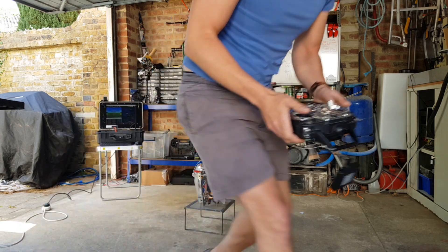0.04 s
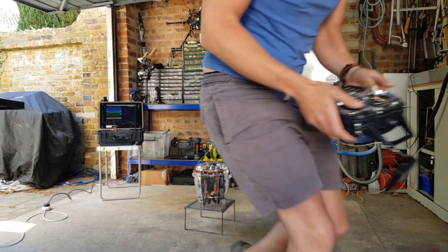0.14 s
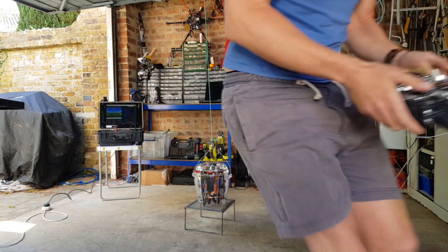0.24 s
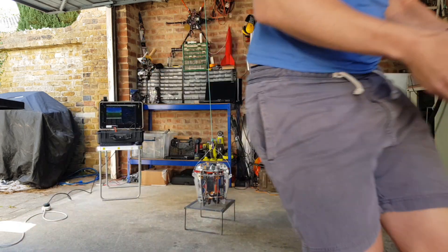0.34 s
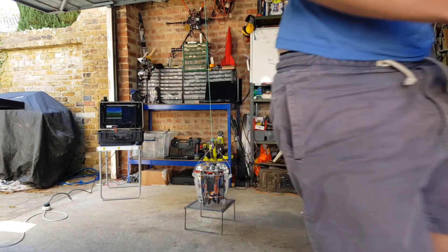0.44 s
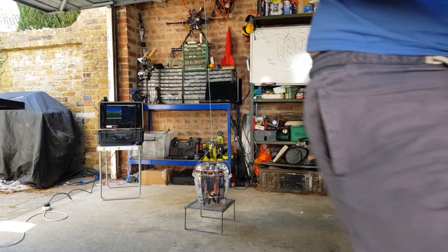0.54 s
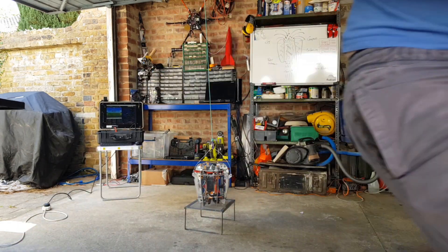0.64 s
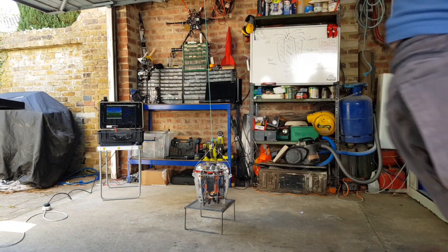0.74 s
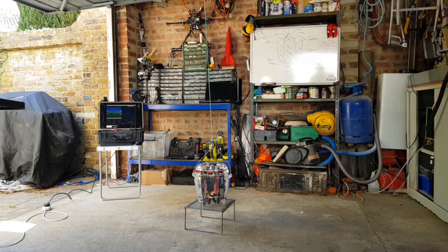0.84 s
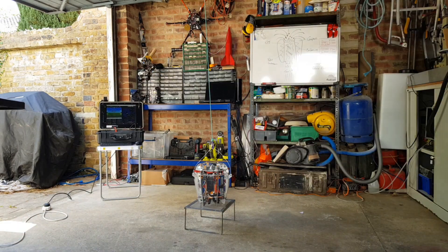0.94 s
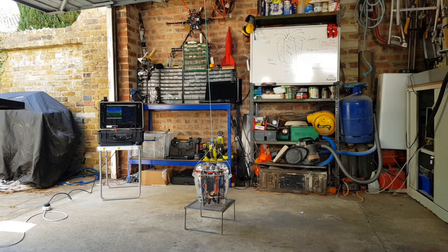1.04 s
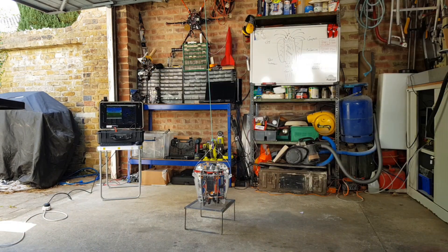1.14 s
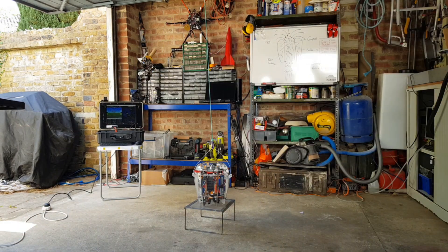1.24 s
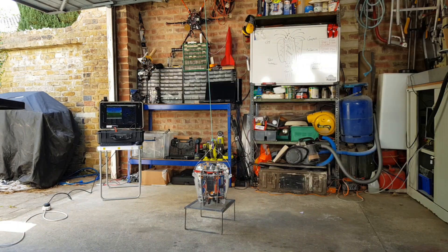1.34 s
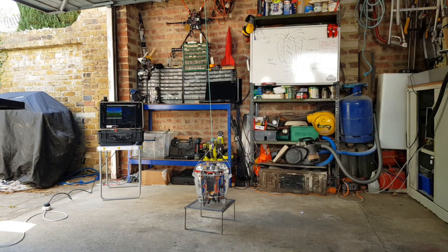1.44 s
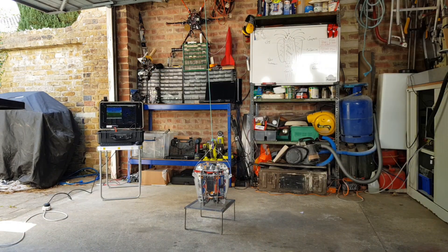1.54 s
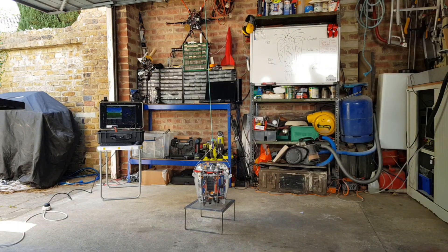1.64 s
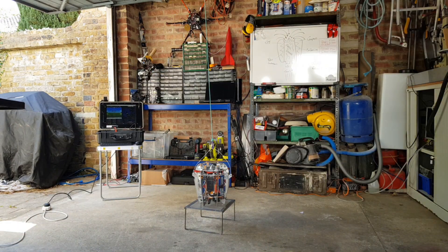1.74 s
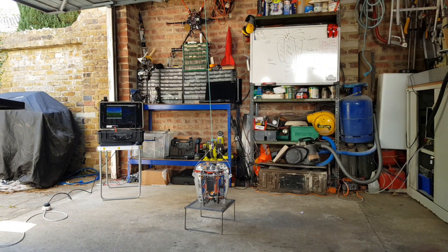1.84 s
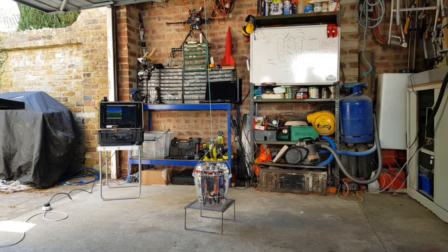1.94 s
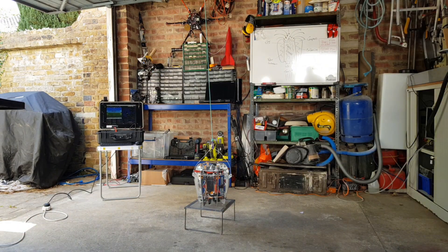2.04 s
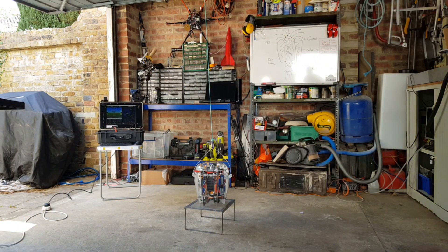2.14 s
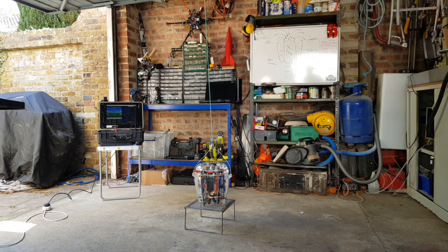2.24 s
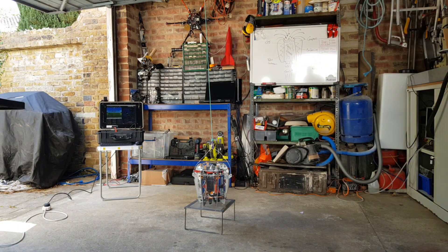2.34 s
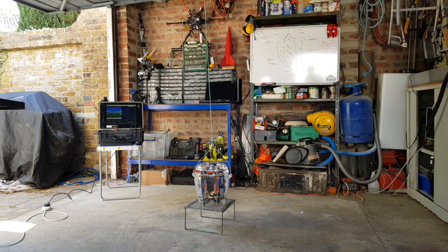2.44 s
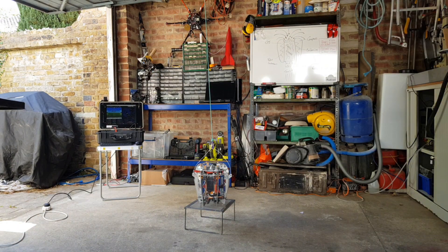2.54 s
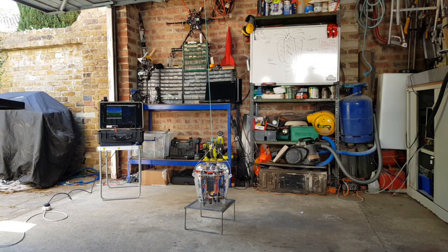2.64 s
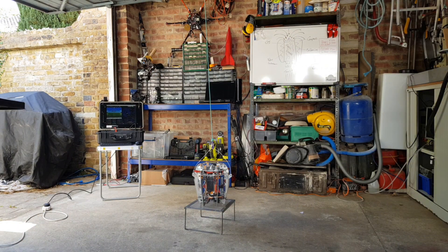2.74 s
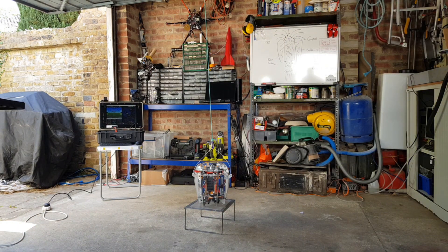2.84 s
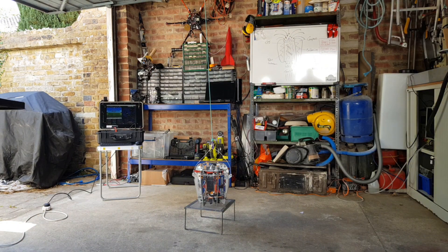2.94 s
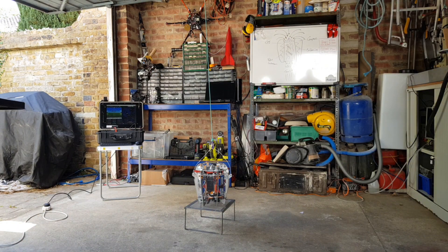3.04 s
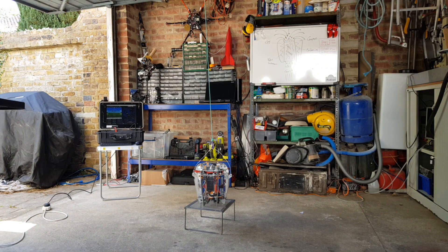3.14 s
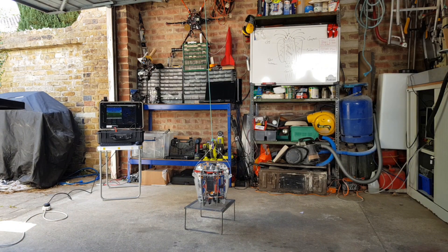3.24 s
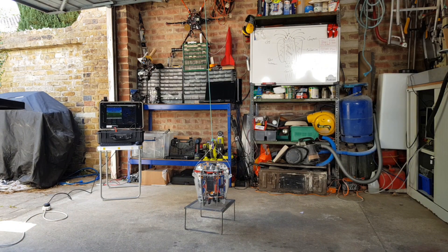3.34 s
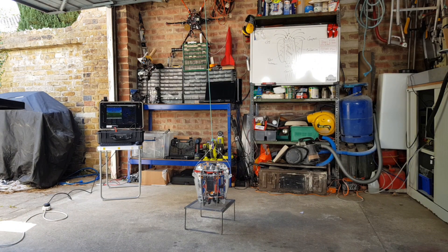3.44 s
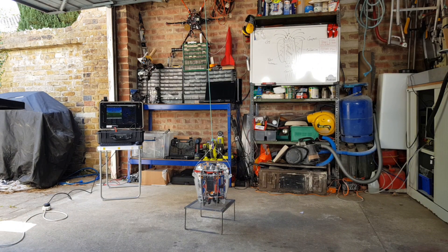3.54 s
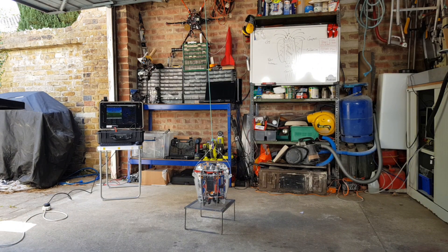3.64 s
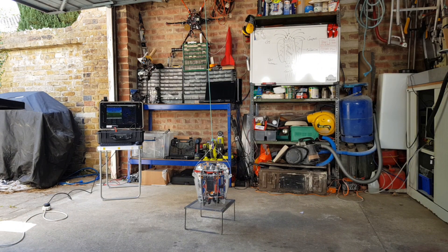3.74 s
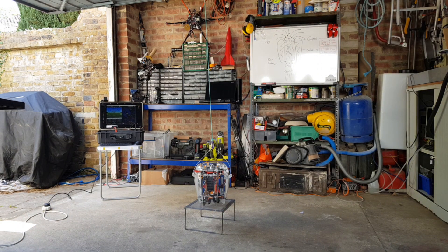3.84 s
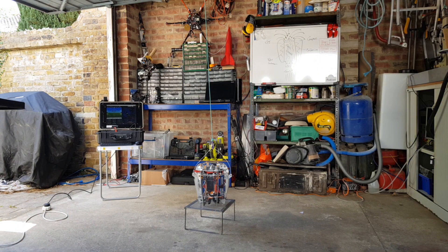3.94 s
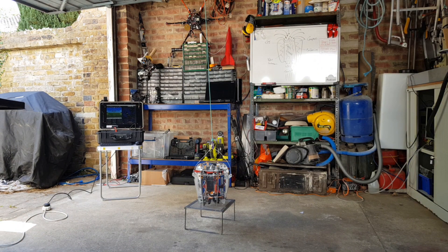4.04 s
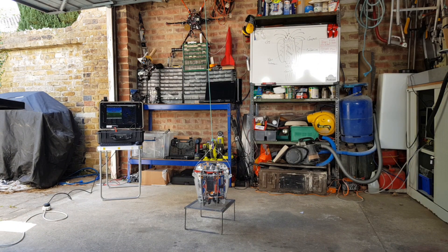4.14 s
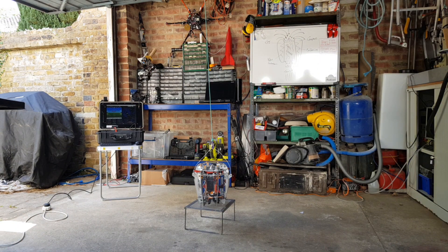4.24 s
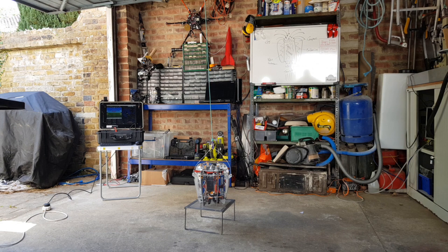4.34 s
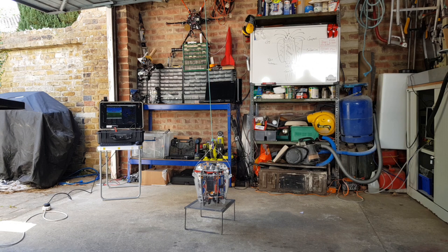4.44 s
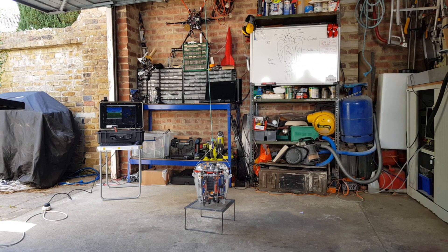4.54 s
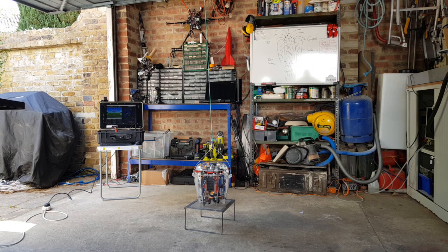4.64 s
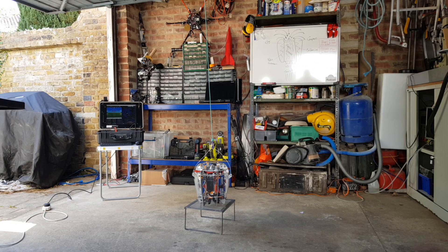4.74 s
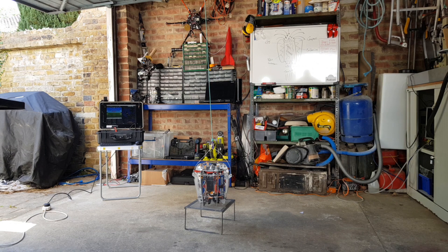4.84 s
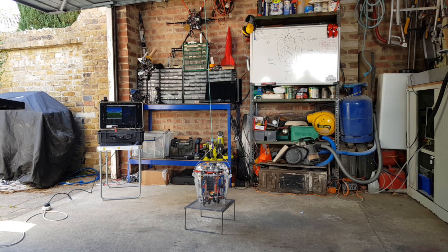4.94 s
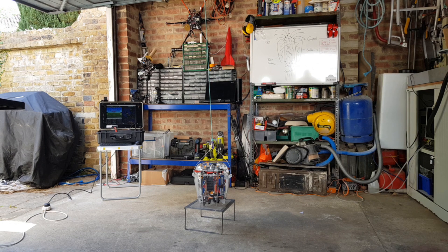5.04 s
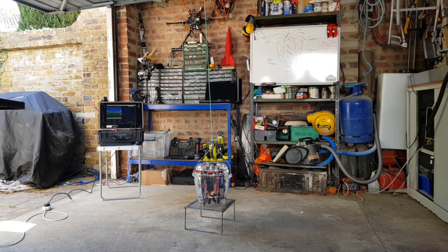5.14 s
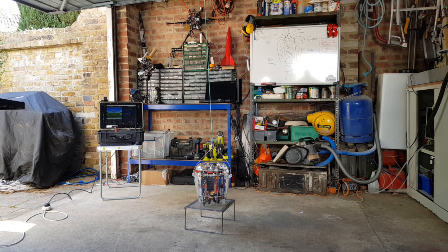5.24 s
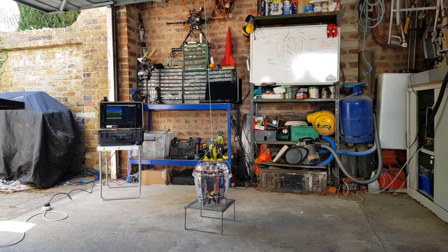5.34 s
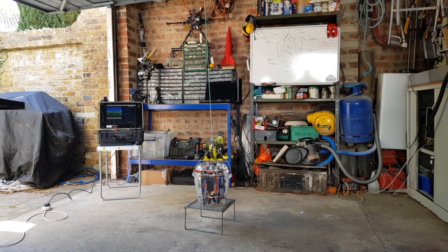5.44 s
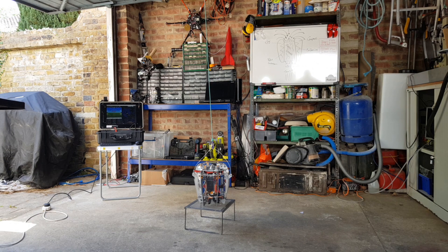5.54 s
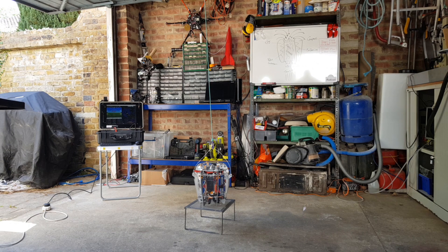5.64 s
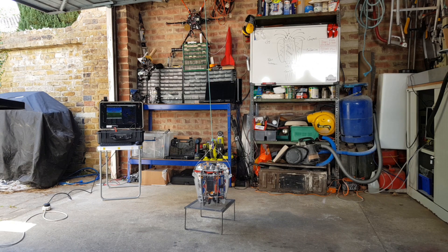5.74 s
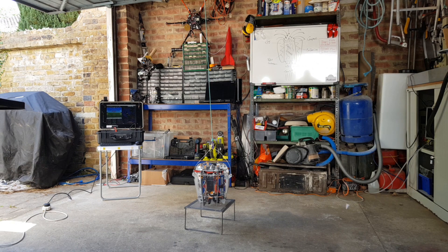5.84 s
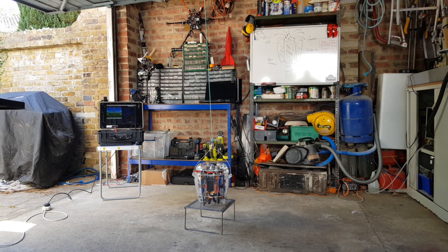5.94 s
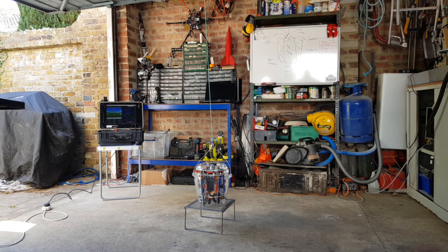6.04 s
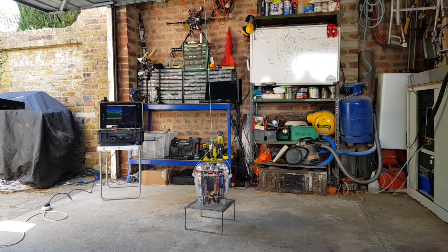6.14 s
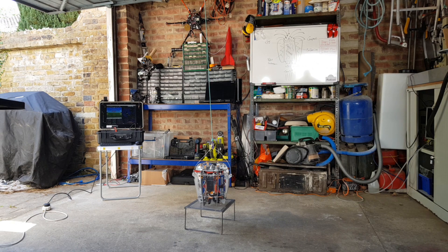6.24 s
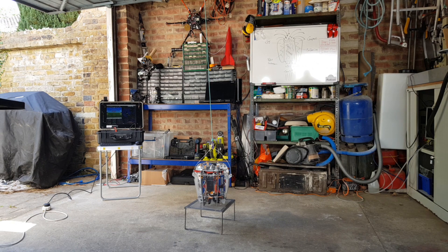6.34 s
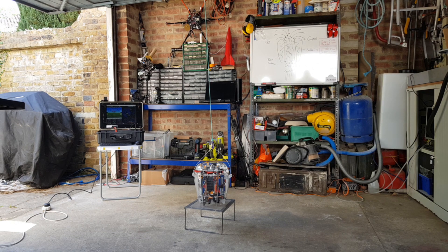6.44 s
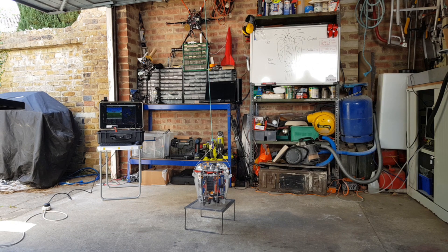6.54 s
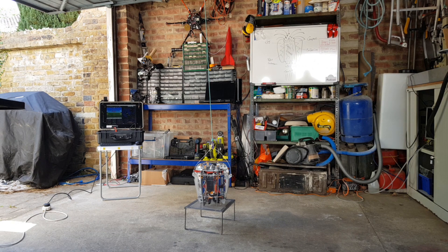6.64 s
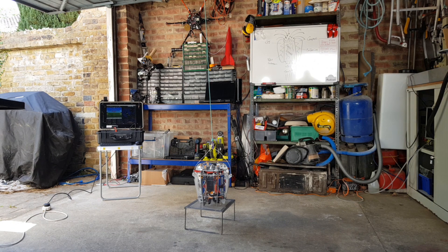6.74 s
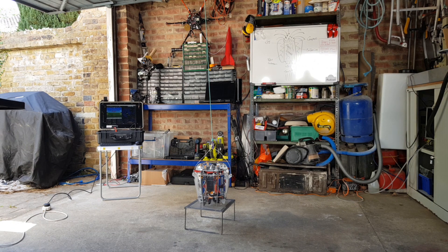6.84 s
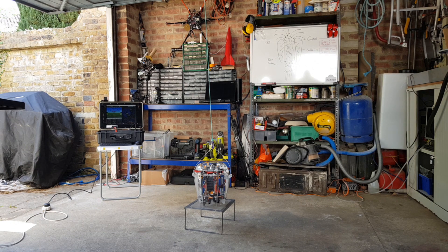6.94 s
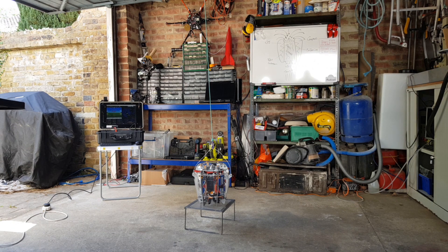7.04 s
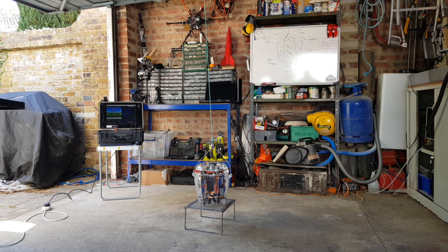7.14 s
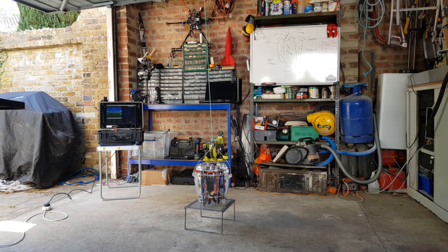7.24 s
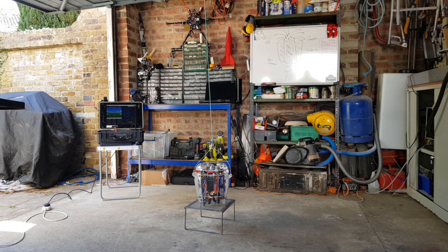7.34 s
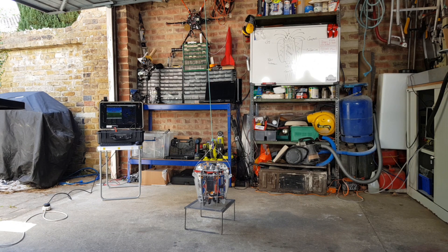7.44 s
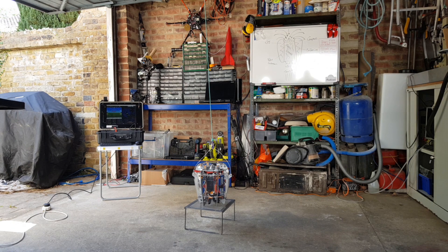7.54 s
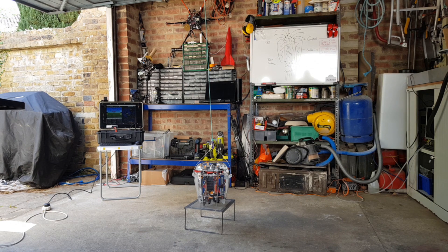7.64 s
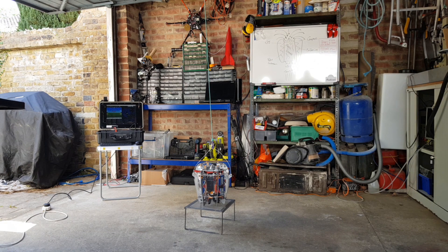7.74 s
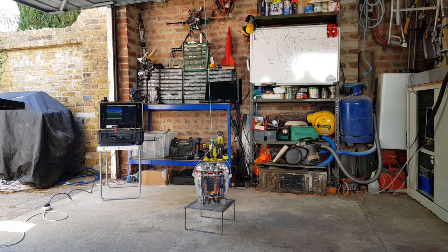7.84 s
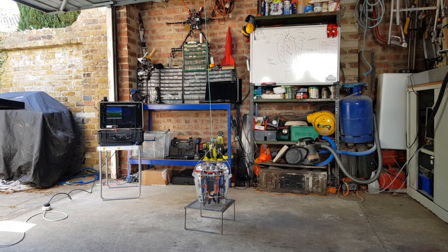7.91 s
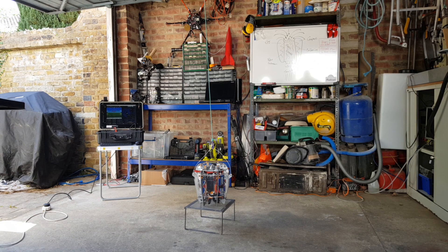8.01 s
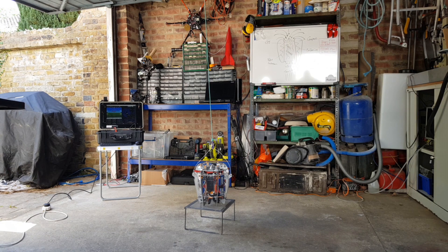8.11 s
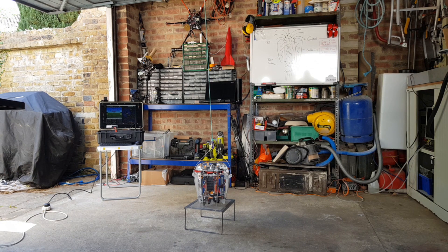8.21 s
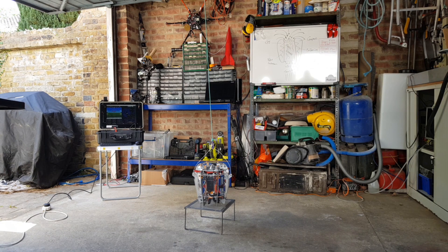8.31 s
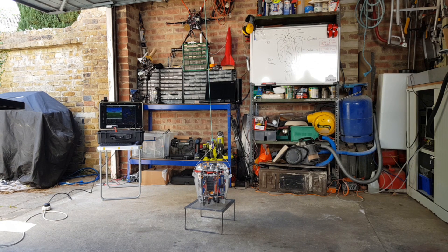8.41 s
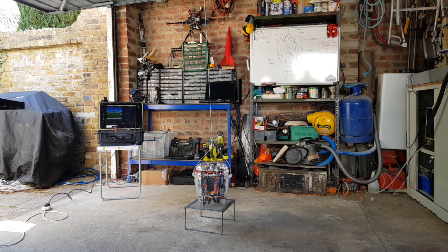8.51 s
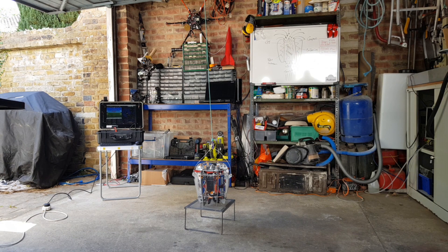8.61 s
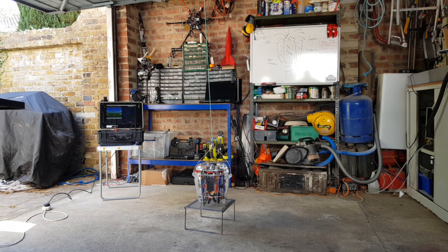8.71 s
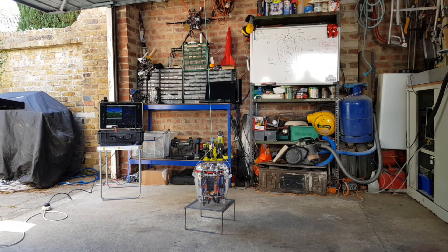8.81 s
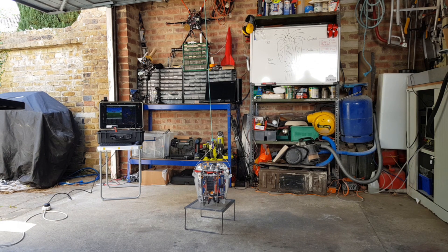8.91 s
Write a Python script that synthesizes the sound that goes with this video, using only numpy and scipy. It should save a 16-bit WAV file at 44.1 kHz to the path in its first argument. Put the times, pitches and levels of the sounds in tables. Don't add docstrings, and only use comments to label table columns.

```python
import sys
import numpy as np
from scipy import signal
from scipy.io import wavfile
from scipy.ndimage import uniform_filter1d

SR = 44100
rng = np.random.default_rng(int(sys.argv[2]) if len(sys.argv) > 2 else 0)


def boost_factor(decibels):
    exponent = np.asarray(decibels, float) / 20
    return 10 ** exponent


def output_pcm(signal):
    pcm = np.clip(np.atleast_2d(signal).T, -1, 1) * 32767
    wavfile.write(sys.argv[1], SR, np.round(pcm).astype(np.int16))


N = 395577
TIME = np.arange(N) / SR
SPINNING = (round(4.7 * SR), N)
IDLE_HZ = 149

# frequency in Hz, likeness [0-1].
LIKENESS = [(60, 0.94), (130, 0.9), (290, 1), (640, 0.66), (1410, 0.32), (3100, 0.34), (6820, 0.24),
            (15000, 0.62)]


def evened(x):
    return x / np.sqrt(np.mean(x ** 2) + 1e-20)


def read(points, hz):
    f, value = np.transpose(points)
    return np.interp(np.log(hz + 1), np.log(f + 1), value)


def curve(rows):
    s, value = np.transpose(rows)
    return np.interp(TIME, s, value)


def lift_db(modes, hz):
    return sum(db / (1 + (2 * (hz - f) / width) ** 2) for f, width, db in modes)


def drift(top_hz, low_hz=.3, start=0):
    coarse = np.arange(0, N / SR + 1, .004)
    hz = np.geomspace(low_hz, top_hz, num=16)[:, None]
    waves = np.sin(2 * np.pi * (hz * coarse + rng.random(hz.shape))) / np.sqrt(hz)
    return np.interp(TIME[start:], coarse, evened(waves.sum(0)))


def noise(spectrum, modes=(), patchy_db=0.5, alike=1., size=512, span=(0, N)):
    # frequency in Hz, left over right in dB.
    lean = [(60, 5), (110, -1), (200, 4.5), (380, 0.5), (700, 4), (1290, 0.5), (2380, 3), (4400, -2.5),
            (8120, 0.5), (15000, 5)]
    length = span[1] - span[0]
    hz = np.fft.rfftfreq(size, 1 / SR)
    a, b, c, d, patches = rng.standard_normal((4 * length // size + 5, len(hz), 5)).T
    patches = uniform_filter1d(patches, size=size // 80, axis=0)
    patches = evened(uniform_filter1d(patches, size=8192 // size, axis=1))
    same = np.clip(alike * read(LIKENESS, hz), -1, 1)[:, None]
    left = a + 1j * b
    z = np.array([left, same * left + np.sqrt(1 - same ** 2) * (c + 1j * d)])
    z *= boost_factor(np.outer([.5, -.5], read(lean, hz)))[:, :, None]
    z *= boost_factor((read(spectrum, hz) + lift_db(modes, hz))[:, None] + patchy_db * patches)
    sound = signal.istft(z, nperseg=size, noverlap=3 * size // 4)[1][:, :length]
    return np.pad(evened(sound), ((0, 0), (span[0], N - span[1])))


def resonate(x, hz, width):
    turn = np.exp(2j * np.pi * np.cumsum(hz * np.ones(x.shape[-1])) / SR)
    r = np.exp(-np.pi * width / SR)
    return 2 * (turn * signal.lfilter([1 - r], [1, -r], x / turn)).real


def add(mix, s, sound, pan_db):
    part = mix[:, round(s * SR):][:, :sound.shape[-1]]
    part += sound[..., :part.shape[1]] * boost_factor([[pan_db / 2], [-pan_db / 2]])


def tone(hz, wobble_db, wander=0.57):
    phase, start = 2 * np.pi * np.cumsum(hz) / SR, N - len(hz)
    ports = []
    for _ in "LR":
        level = np.sqrt(2) * boost_factor(wobble_db * drift(24, 1.8, start))
        ports.append(level * np.sin(phase + wander * drift(14, .3, start)))
    return np.array(ports)


def background():
    # frequency in Hz, density in dB per Hz.
    air = [(20, 5), (50, 26.5), (150, 8.5), (300, 12.5), (1000, 2), (1500, 2), (3000, -39), (4500, -8),
           (5000, -2), (5500, -5), (8600, -8), (9400, -4), (11000, 5), (15700, 1.5), (17000, -17)]
    port = [(760, -65), (1300, -51), (1600, -27), (1810, -14), (2020, -9), (2290, -1.5), (2440, -6.5),
            (2820, -13), (3070, -22), (4200, -30), (5460, -69), (9240, -120)]
    out = boost_factor(-69.5) * noise(air, alike=0.69, size=2048)
    out += boost_factor(-90) * tone(np.full(N, 4910.), 4.5)
    out += boost_factor(-60) * noise(port, patchy_db=1.6)[0] * boost_factor([[0], [-27]])
    return out


def drags():
    # time in seconds, effort in dB.
    rustle = [(.08, -32), (.28, -16), (.5, -19), (.67, -17), (.9, -18), (1.05, -12), (1.2, -12),
              (1.38, -15)]
    shuffle = [(1.42, -14), (1.49, 2), (1.56, -4), (1.62, 2.5), (1.69, -5), (1.82, 3.5), (1.99, -3),
               (2.08, 1), (2.26, 0), (2.31, -6), (2.39, 1), (2.9, -1), (3.07, -2.5), (3.11, 0), (3.36, -4),
               (3.41, 2), (3.53, -3), (3.7, -38)]
    # time in seconds, level in dB, t60 in seconds.
    thuds = [
        (0.2, -44.5, .33),
        (0.575, -42, 0.5),
        (1.06, -47, 1.3),
        (1.69, -67, .9),
        (2.08, -71, 2.),
        (2.74, -55, 0.51),
    ]
    # frequency in Hz, density in dB per Hz.
    scrape = [(880, -25), (1500, -8), (2110, -7.5), (3070, -4), (4080, -2.5), (4550, -6), (6090, -4.5),
              (8420, -11), (9550, -22), (11000, -15.5), (14300, -38), (22000, -120)]
    fizz = [(6000, -14), (9000, -4), (12000, 0), (16000, -10), (17000, -32)]
    body = [(200, -25), (330, -6.5), (590, 4.5), (900, -9), (1330, 2), (1700, -5), (2300, -15.5)]
    rumble = [(20, -16), (35, -9), (55, -3), (90, -11.5), (180, -4.5), (260, -19.5), (400, -32)]
    # frequency in Hz, width in Hz, lift in dB.
    sole = [(1295, 170, 6.5), (3900, 300, -3), (6070, 300, 1.5), (8460, 920, 4.5)]
    walking = (0, round(3.8 * SR))
    load_db_per_s = 298

    grains = boost_factor(1.5 * np.minimum(rng.exponential(1, N), 3)) * (rng.random(N) < 500 / SR)
    grit = evened(1 + 0.18 * signal.lfilter([1], [1, -.985], grains))
    grit *= np.interp(TIME, [3.62, 3.75], [1, 0])
    weight = 0
    for s, db, t60 in thuds:
        weight = weight + boost_factor(db + np.minimum(load_db_per_s * (TIME - s), 60 * (s - TIME) / t60))
    out = weight * noise(rumble, size=1024, span=walking)

    effort_db = curve(rustle + shuffle)
    leaving_db = -2.5 * np.maximum(TIME - shuffle[1][0], 0)
    light_db = .8 * np.minimum(effort_db + 5, 0)
    layers = [(scrape, -52, .55), (fizz, -59.5 + leaving_db, 1.1), (body, -56.5 + leaving_db + light_db, .9)]
    for spectrum, db, alike in layers:
        rub = noise(spectrum, sole, patchy_db=2.5, alike=alike, size=256, span=walking)
        out += boost_factor(effort_db + db) * grit * rub
    return out


def steps():
    # time in seconds, peak in dB, ring in Hz, slap in dB.
    blows = [(0.099, -28.5, 480, -42), (0.191, -31, 360, -23), (0.246, -33.5, 180, -14),
             (0.515, -33.5, 593, -33), (0.63, -33.5, 330, -26), (1.014, -31, 177, -35),
             (1.044, -30.5, 178, -38), (1.089, -30.5, 179, -9), (1.482, -31, 520, -3),
             (1.608, -36.5, 1750, -5.5), (1.689, -28, 172, -25), (1.795, -30, 560, -6),
             (2.0, -44, 1350, -8), (2.091, -27, 855, -9), (2.18, -30, 440, -21), (2.228, -37, 1830, -8),
             (2.259, -23, 1300, -1), (2.416, -28.5, 640, -5), (2.543, -30.5, 640, -10),
             (2.725, -29.5, 320, -20), (2.748, -34, 800, -4), (2.858, -46.5, 401, 6),
             (2.977, -44, 1150, -15), (3.064, -34, 530, -14), (3.2, -45.5, 2400, -20),
             (3.075, -40, 1100, -12), (2.251, -36, 1500, -12), (1.583, -46, 1370, -20),
             (2.345, -41, 1300, -15), (2.548, -36, 900, -12), (3.408, -40, 1700, -12),
             (3.432, -42, 1600, -12), (3.445, -43, 1900, -12), (1.803, -33, 600, -10),
             (1.49, -34, 600, -10), (2.195, -36, 450, -25), (.177, -36, 170, -30), (2.565, -39, 180, -25),
             (2.266, -31, 1740, -6), (1.901, -40, 1900, -8), (0.848, -55.5, 1100, -8)]
    sole_top_hz = 2200
    out, t = np.zeros((2, N)), TIME[:SR // 5]
    for s, db, hz, slap_db in blows:
        softness_db = min(slap_db, 0)
        t60 = 0.046 - .0034 * softness_db
        burst = rng.standard_normal(len(t)) * boost_factor(-60 * t / t60) * np.minimum(t / 0.0036, 1)
        burst[60] += boost_factor(15 + 0.35 * softness_db)
        ring = resonate(resonate(burst, hz, 0.5 * hz), hz, 2.4 * hz)
        slap = resonate(resonate(burst * boost_factor(-300 * t), 930, 1160), 980, 1900)
        blow = ring / abs(ring).max() + boost_factor(slap_db + 8) * slap / abs(slap).max()
        muffle = signal.butter(2, max(sole_top_hz, 1.5 * hz), fs=SR, output="sos")
        add(out, s + 0.001794, boost_factor(db - 5.5) * signal.sosfilt(muffle, blow), 2.2)
    return out


def scuffs():
    # start in seconds, hold in seconds, level in dB, brightest Hz, width in Hz.
    slides = [(0.103, 0.048, -48.5, 12000, 7300), (0.201, 0.01, -56, 7700, 6000),
              (0.244, 0.06, -60.5, 11000, 8000), (0.517, 0.048, -35, 10900, 8800),
              (0.529, 0.011, -37.5, 2620, 830), (0.48, 0.055, -64, 10000, 10000),
              (1., 0.07, -57.5, 9000, 13000), (1.046, 0.008, -41.5, 12000, 6600),
              (4.58, .07, -75, 5900, 3030), (.516, 0.07, -51, 770, 700), (1.81, 0.1, -51.5, 2200, 3300),
              (.247, .02, -48.5, 670, 740), (3.395, 0.08, -55, 580, 70), (2.519, .05, -52, 3000, 2700),
              (1.49, .018, -45, 11000, 8000), (1.44, .05, -58, 6000, 1500), (4.15, .06, -80, 6500, 3000),
              (2.335, .03, -57, 6230, 400), (1.755, .02, -56, 4000, 250), (3.08, .1, -64, 1330, 200),
              (3.09, .05, -60, 3400, 500), (1.83, .07, -56, 1900, 300), (.74, .02, -56, 9000, 8000),
              (3.08, .07, -62, 560, 200), (3.4, .06, -51.5, 1500, 900), (3.47, .07, -60, 1340, 200)]
    jerks = [
        (4.751, 0.09, -48.5, 700, 800),
        (4.752, .05, -64, 9500, 300),
        (4.752, 0.055, -60, 9000, 9000),
        (4.875, 0.053, -50.5, 6000, 8000),
        (4.919, 0.03, -42, 584, 50),
        (4.94, .2, -48, 380, 160),
    ]
    out, t = np.zeros((2, N)), TIME[:SR // 3]
    for s, held, db, hz, width in slides + jerks:
        common, left, right, sand = rng.standard_normal((4, len(t)))
        rub = common + np.array([left, right])
        band = evened(resonate(resonate(rub, hz, width), hz, 1.26 * width))
        shape = np.minimum(t / 0.01, 1) * boost_factor(db - 60 * np.maximum(t - held, 0) / 0.16)
        grit = boost_factor(2.7 * evened(uniform_filter1d(sand, size=90)))
        add(out, s, band * shape * grit, 1.2)
    return out


def ticks():
    # time in seconds, peak in dB, ring in Hz, left over right in dB.
    touches = [(0.105, -27, 1300, 7), (0.2468, -30.5, 1000, 2), (0.2054, -32, 11300, 7),
               (0.2866, -38.5, 6880, 0.0), (0.736, -29, 7260, -18), (0.7413, -33, 3900, -16),
               (0.9501, -34.5, 6900, -15), (0.9847, -33, 7780, -16), (0.994, -40, 6560, -15),
               (1.0026, -35, 8780, -9), (1.051, -29.5, 11600, -13), (1.057, -36, 11800, 6),
               (1.0916, -35, 5820, -20), (1.113, -30, 7140, -19), (1.118, -30, 6840, -17),
               (1.1542, -19, 5900, -14), (1.163, -27, 11600, -14), (1.297, -39, 6720, -10),
               (1.322, -40, 6500, -10), (1.4965, -30, 11000, -1), (1.499, -26, 6000, -1.5),
               (1.3648, -42, 11100, -8), (1.0501, -33, 7000, -3), (1.623, -40, 11000, 0),
               (1.7136, -41, 5930, -2), (1.7992, -37, 6070, 3), (1.9035, -38, 3330, 0),
               (2.2317, -36, 3340, 0), (2.551, -37, 3280, 1), (3.4225, -38, 3760, -1),
               (3.445, -40, 3500, 0), (.5282, -26, 7660, -2), (.1132, -36, 10900, 4),
               (.2795, -42, 10000, 0), (1.8121, -22.5, 11500, 10), (2.093, -29, 3450, 12),
               (2.4176, -27, 4120, 3), (3.393, -25, 3880, 2)]
    out, t = np.zeros((2, N)), TIME[:SR // 20]
    for s, db, hz, pan_db in touches:
        burst = rng.standard_normal(len(t)) * boost_factor(-60 * t / .014)
        burst[8] = 4
        ring = resonate(resonate(burst, hz, 2200), hz, 3100)
        crack = resonate(resonate(burst, 9200, 7600), 9900, 8200)
        too_small_for_bass = signal.butter(2, .6 * min(hz, 6500), "high", fs=SR, output="sos")
        tick = signal.sosfilt(too_small_for_bass, ring + 0.56 * crack)
        add(out, s, boost_factor(db - 3) * tick / abs(tick).max(), pan_db)
    return out


def garage(x):
    # frequency in Hz, t60 in seconds.
    decay = [(100, 0.16), (500, 0.38), (2000, 0.35), (8000, 0.13), (16000, 0.062)]
    taps = np.zeros((2, SR // 2))
    at = np.arange(300, SR // 2 - 20, 20)
    at = at + rng.integers(0, 20, (2, len(at)))
    np.put_along_axis(taps, at, rng.choice([-1., 1.], at.shape), 1)
    hz, t, z = signal.stft(taps, SR, nperseg=256)
    same = np.clip(read(LIKENESS, hz), 0, 1)[:, None]
    z[1] = same * z[0] + np.sqrt(1 - same ** 2) * z[1]
    tail = signal.istft(z * boost_factor(-60 * t / read(decay, hz)[:, None]), SR, nperseg=256)[1]
    return signal.fftconvolve(x.mean(0)[None], tail / np.linalg.norm(tail[0]), axes=1)[:, :N]


def rotor():
    # time in seconds, turns per second.
    spool = [(4.74, 24), (4.864, 43), (4.9, 46.8), (4.96, 49.5), (5.016, 59), (5.052, 73), (5.1, 100),
             (5.17, 110), (5.3, 143)]
    speed = [(5.34, 146), (5.46, 149), (6.4, 150), (6.65, 152.3), (6.8, 176.5), (6.9, 184.5), (7.5, 185.3),
             (7.655, 187.8), (7.735, 195.8), (7.97, 196.3), (8.05, 199.8), (8.2, 202.1), (8.37, 212.2),
             (8.51, 215.2), (8.72, 225), (8.79, 226), (8.97, 237)]
    inertia_s = .03
    shaft = uniform_filter1d(curve(spool + speed), size=round(inertia_s * SR), mode="nearest")
    pull = np.clip(np.gradient(shaft) * SR / 100, 0, 2)
    return shaft, np.log10(shaft / IDLE_HZ), pull


def jet():
    # frequency in Hz, density in dB per Hz.
    roar = [(18, -61), (30, -41.5), (345, -11), (416, -7.5), (746, -5), (864, -4.5), (1020, 0.5),
            (1110, -4), (1210, 0), (2030, -7), (4400, -22.5), (5720, -36), (9680, -120)]
    hiss = [(1290, -22), (2200, -4), (3530, -6.5), (4400, -9), (5400, -8), (7410, -6.5), (8840, -11),
            (11800, -9), (14500, -14.5), (16100, -17), (16500, -69)]
    # frequency in Hz, width in Hz, lift in dB.
    duct = [(420, 33, 5), (526, 46, -3.5), (780, 42, 1.5), (1060, 47, 3), (1160, 53, 1.5), (1449, 28, 7),
            (1110, 40, -10), (890, 32, -5)]
    # time in seconds, half width in seconds, level in dB.
    stalls = [
        (4.85, 0.027, -10),
        (4.99, 0.046, -3),
        (5.14, 0.084, -1.5),
    ]
    start_s, catch_s, full_hz = 4.74, .07, 192

    _, decades, pull = rotor()
    catch_db = -16 * np.clip(1 - (TIME - start_s) / catch_s, 0, 1)
    stall_db = sum(db * np.exp(-((TIME - s) / half) ** 2) for s, half, db in stalls)
    flow = np.minimum(decades, np.log10(full_hz / IDLE_HZ))
    roar_db = -28.5 + 26.5 * flow + 0.42 * pull + catch_db + .6 * stall_db
    hiss_db = -31.5 + 38 * decades + 0.64 * pull + catch_db + stall_db
    gusts_db = drift(30)
    out = boost_factor(roar_db - 2.0 + 0.26 * gusts_db) * noise(roar, duct, patchy_db=1.06, size=2048, span=SPINNING)
    out += boost_factor(hiss_db + 0.28 * gusts_db) * noise(hiss, patchy_db=1.2, span=SPINNING)
    ring = resonate(rng.standard_normal((2, N)) + rng.standard_normal(N), 1196, 170)
    flutter_db = -37 + 1.4 * (hiss_db + 27) + 2.5 * drift(20, 3)
    return out + boost_factor(flutter_db) * evened(resonate(ring, 1200, 200))


def blade_tone(shaft):
    # frequency in Hz, width in Hz, lift in dB.
    modes = [(558, 127, 20.5), (1792, 84, 25), (1826, 24, -3), (2040, 220, 9), (2395, 30, -6),
             (2562, 20, -6), (2230, 150, 11), (2345, 64, 17.5), (2447, 115, 10.5), (2536, 54, 16.5),
             (2600, 45, 13), (2705, 83, 12.5), (2776, 240, 16)]
    at_speed = np.clip((shaft - 190) / 18, 0, 1)
    flicker_db = 1 + 3.5 * at_speed * np.minimum(drift(35, 8, SPINNING[0]), .8)
    return boost_factor(-55 + lift_db(modes, 12 * shaft) + flicker_db) * tone(12 * shaft, .5, .15)


def flares(shaft):
    # start in seconds, end in seconds, multiple of the shaft rate, level in dB.
    swells = [(4.76, 4.9, 22, -48), (4.87, 4.95, 36, -43), (4.84, 4.93, 60, -52), (4.85, 4.95, 48, -52),
              (4.88, 5.02, 24, -45), (4.94, 5.03, 36, -48), (4.97, 5.08, 8, -43), (4.77, 4.84, 48, -58),
              (4.88, 4.95, 84, -59), (4.98, 5.03, 56, -56), (5.02, 5.07, 48, -55), (5.1, 5.2, 26, -50),
              (5.15, 5.23, 25, -49), (5.08, 5.15, 36, -55), (4.93, 5., 32, -49), (4.97, 5.04, 20, -48),
              (5.03, 5.09, 16, -46), (4.76, 4.85, 32, -54), (4.78, 4.86, 16, -50), (5.24, 5.36, 24, -48),
              (5.2, 5.3, 18, -47), (5.3, 5.45, 36, -47), (8.32, 8.41, 12, -37), (8.46, 8.68, 12, -40),
              (8.84, 8.97, 12, -40), (8.74, 8.82, 12, -33), (8.15, 8.26, 12, -38), (4.92, 4.97, 16, -47),
              (5.01, 5.08, 24, -46), (5.07, 5.14, 24, -47), (5.06, 5.16, 8, -44), (5.16, 5.28, 8, -43),
              (5.07, 5.2, 12, -39), (5.18, 5.27, 12, -41), (5.24, 5.38, 12, -39), (5.26, 5.36, 9, -40),
              (5.28, 5.4, 7, -42), (5.15, 5.25, 4, -45), (5.2, 5.33, 16, -44), (6.5, 6.74, 12, -39),
              (6.74, 6.86, 12, -40), (6.82, 6.93, 40, -40), (6.8, 6.92, 24, -42), (6.78, 6.9, 38, -43),
              (7.62, 7.74, 12, -37), (7.92, 8.08, 12, -38), (8.55, 8.97, 7, -39), (8.6, 8.97, 5.25, -35),
              (7.95, 8.97, 24, -46)]
    first = SPINNING[0]
    turns = np.cumsum(shaft) / SR
    rasp = boost_factor(3 * drift(90, 15, first))
    out = np.zeros((2, len(shaft)))
    for start, end, order, db in swells:
        span = slice(round(start * SR) - first, round(end * SR) - first)
        swell = 1.8 * boost_factor(db) * rasp[span] * np.hanning(span.stop - span.start)
        out[:, span] += swell * np.sin(2 * np.pi * order * turns[span])
    return out


def shaft_hum(shaft):
    # frequency in Hz, width in Hz, lift in dB.
    modes = [(141.8, 15.3, 14.5), (152.1, 3.5, -13), (186, 4.3, -10), (200.3, 17, 13.5), (210.5, 3.4, -12),
             (223, 32.5, 14)]
    hum_db = -58 + lift_db(modes, shaft) + .8 * np.minimum(shaft - 128, 0)
    hum = np.sqrt(2) * np.sin(2 * np.pi * np.cumsum(shaft) / SR)
    return boost_factor(hum_db) * hum * boost_factor([[.8], [-.8]])


def shaft_orders(shaft, decades, pull):
    # multiple of the shaft rate, level in dB.
    orders = [(2, -30), (4, -21), (7, -16.5), (8, -18.5), (24, -12), (36, -15.5), (40, -18.5), (48, -23),
              (50, -18)]
    # frequency in Hz, width in Hz, lift in dB.
    housing = [(385, 60, 19), (1710, 430, 12), (2800, 190, 12), (3670, 170, 4), (5300, 300, 4.5),
               (7270, 390, 9.5)]
    all_db = -33.5 + 25 * np.minimum(decades, 0) - 4 * pull
    all_db = all_db - 14 * np.clip((147 - shaft) / 15, 0, 1)
    out = np.zeros((2, len(shaft)))
    for order, db in orders:
        hz = order * shaft
        out += boost_factor(db + all_db + lift_db(housing, hz)) * tone(hz, 1.3, .35)
    return out


def vortex_whistle(shaft):
    hz = (32 - .0008 * (shaft - 212) ** 2) * shaft
    above = shaft - 177
    whistle_db = np.minimum(-38.5 + 0.3 * above, -32) + 1.2 * np.minimum(above, 0)
    lower_db = -4 - 1.3 * np.maximum(shaft - 197, 0)
    out = np.zeros((2, len(shaft)))
    for share, db, width in [(1, -5.5, 70), (.79, lower_db, 80)]:
        eddy = rng.standard_normal((2, len(shaft)))
        whistle = evened(resonate(resonate(eddy, share * hz, width), share * hz, width))
        out += boost_factor(whistle_db + db + 2.2 * drift(18, 2.5, SPINNING[0])) * whistle
    return out


def whine():
    first = SPINNING[0]
    shaft, decades, pull = (c[first:] for c in rotor())
    out = blade_tone(shaft) + flares(shaft) + shaft_hum(shaft)
    out += shaft_orders(shaft, decades, pull) + vortex_whistle(shaft)
    return np.pad(out, ((0, 0), (first, 0)))


def starved(x):
    hz, t, z = signal.stft(x, SR, nperseg=1024)
    hit, depth = rng.random((2, len(t) // 2 + 1, 43))
    dip_db = -5 * (hit < .16) * (1 + depth + 9 * (depth > .95))
    dip_db = dip_db.repeat(2, 0).repeat(12, 1).T[:len(hz), :len(t)]
    dip_db = np.where(np.roll(dip_db, 1, axis=1) < -40, -70, dip_db)
    loud = np.clip((t - 4.6) / 3.3, 0, 1) ** .7
    treble = np.clip(hz / 4500 - 1, 0, 1)[:, None]
    return signal.istft(z * boost_factor(dip_db * loud * treble), SR, nperseg=1024)[1][:, :N]


def scene():
    running = np.clip((TIME - 4.749) / 0.025, 0, 1)
    blows = signal.sosfilt(signal.butter(2, 130, "high", fs=SR, output="sos"), steps() + ticks())
    air, lines = jet() * running, whine() * running
    wet = garage(boost_factor(-15) * blows + boost_factor(-11) * air + boost_factor(-16) * lines)
    return background() + drags() + blows + scuffs() + boost_factor(1.0) * air + lines + wet


def band_limit(x):
    return signal.sosfilt(signal.butter(12, 17010, fs=SR, output="sos"), x)


def record(dry):
    dry = signal.sosfilt(signal.butter(2, 38, "high", fs=SR, output="sos"), dry)
    edge = signal.firwin(2047, 15790, window=("kaiser", 8), fs=SR)
    mix = signal.oaconvolve(starved(dry), edge[None], "same")
    return band_limit(mix)


dry = scene()
out = record(dry)
output_pcm(out)
```